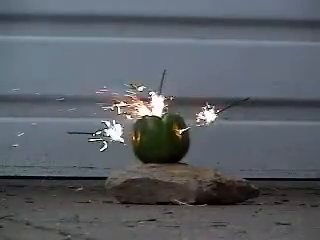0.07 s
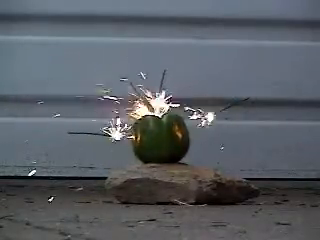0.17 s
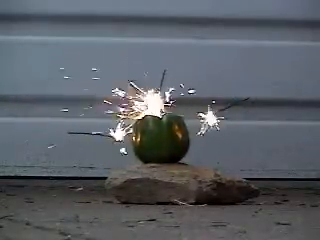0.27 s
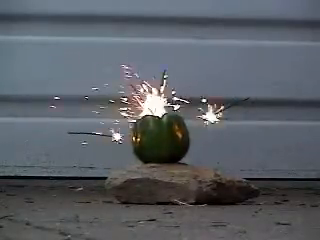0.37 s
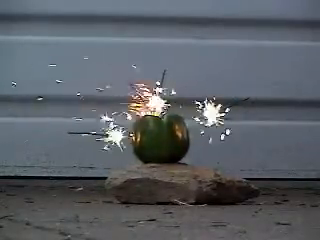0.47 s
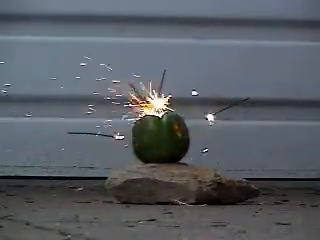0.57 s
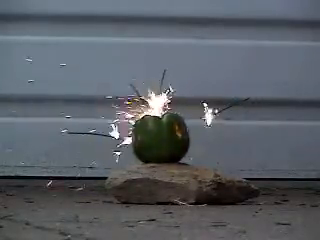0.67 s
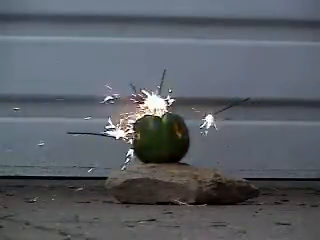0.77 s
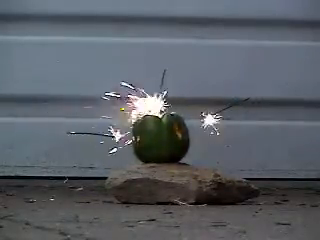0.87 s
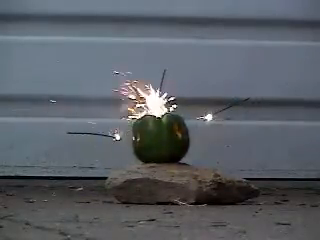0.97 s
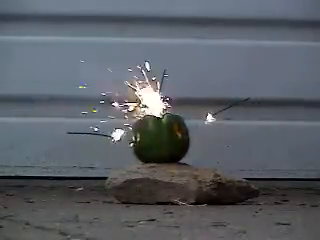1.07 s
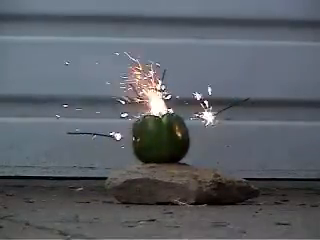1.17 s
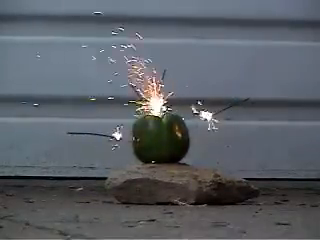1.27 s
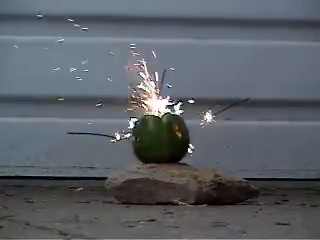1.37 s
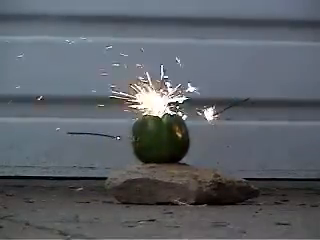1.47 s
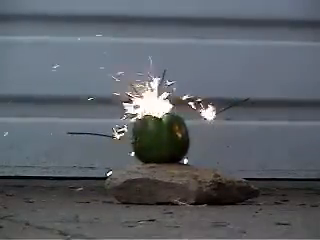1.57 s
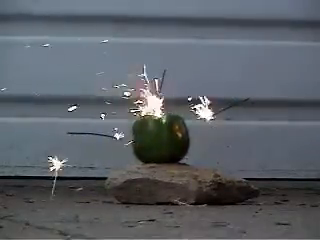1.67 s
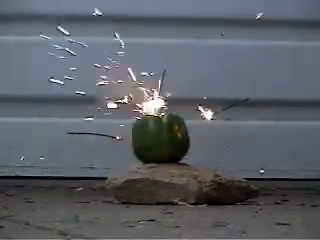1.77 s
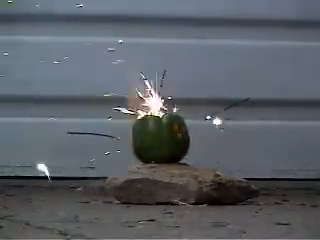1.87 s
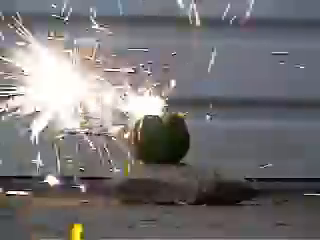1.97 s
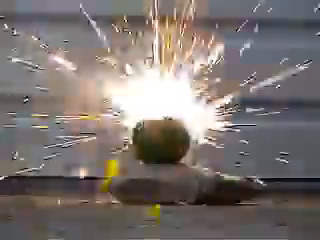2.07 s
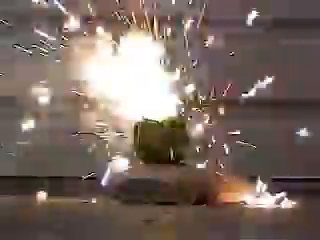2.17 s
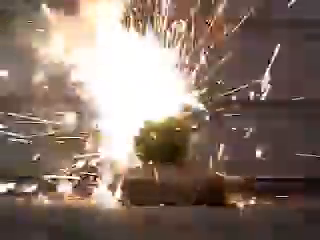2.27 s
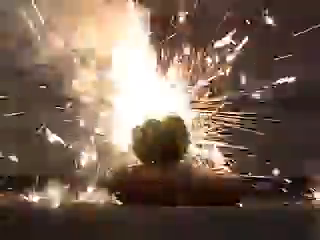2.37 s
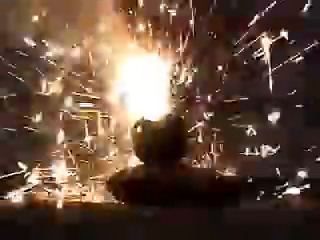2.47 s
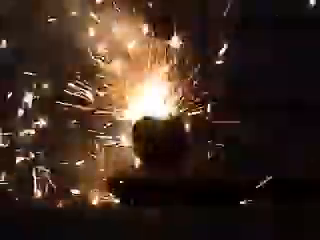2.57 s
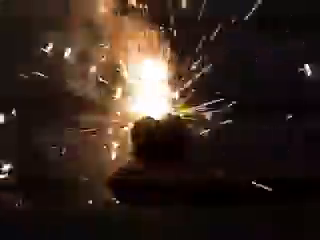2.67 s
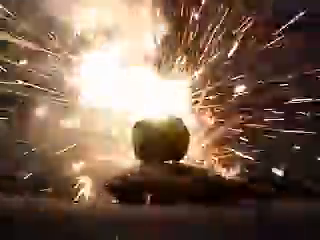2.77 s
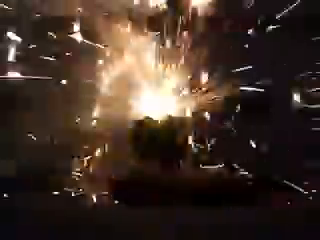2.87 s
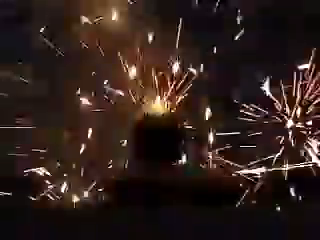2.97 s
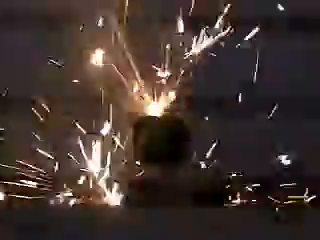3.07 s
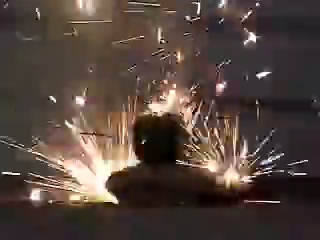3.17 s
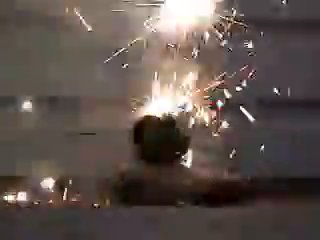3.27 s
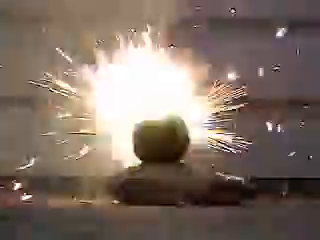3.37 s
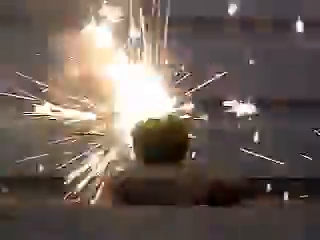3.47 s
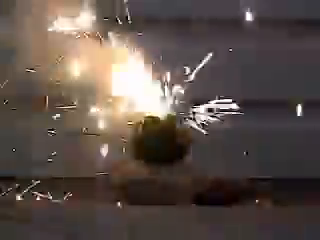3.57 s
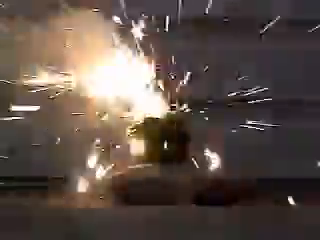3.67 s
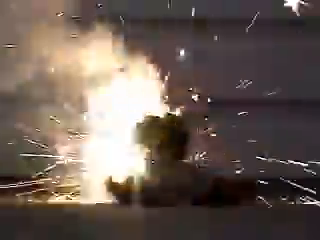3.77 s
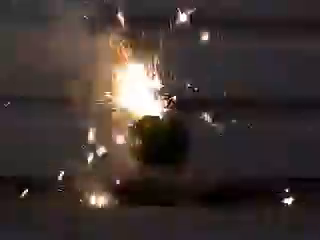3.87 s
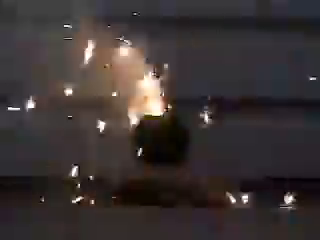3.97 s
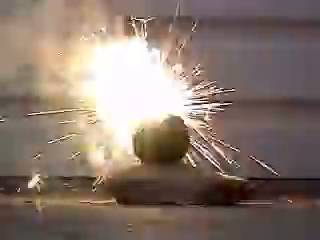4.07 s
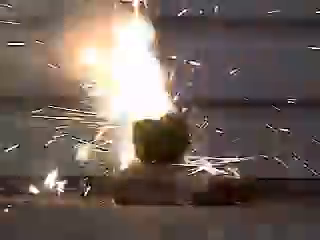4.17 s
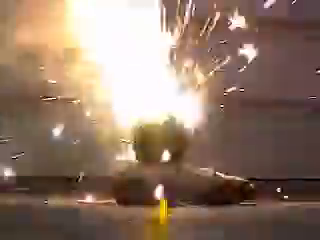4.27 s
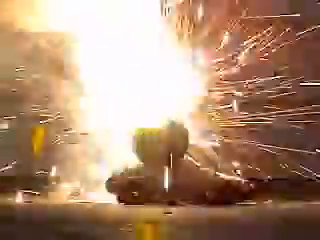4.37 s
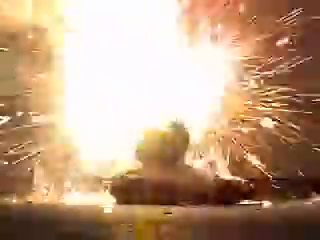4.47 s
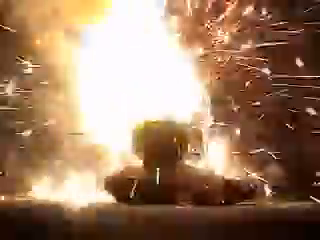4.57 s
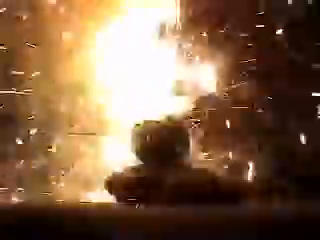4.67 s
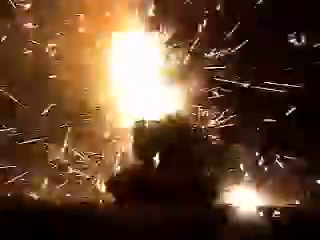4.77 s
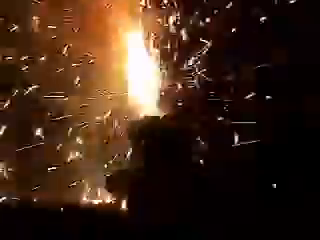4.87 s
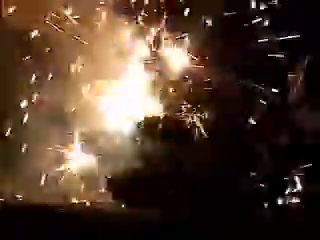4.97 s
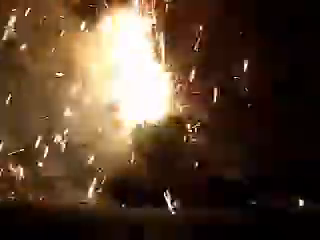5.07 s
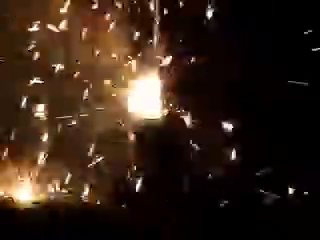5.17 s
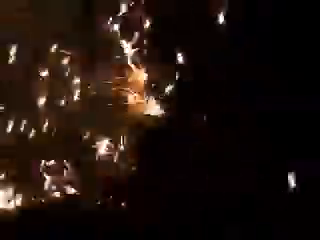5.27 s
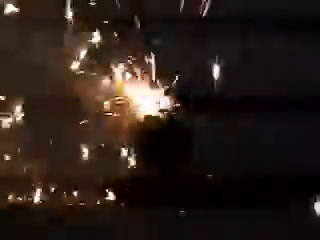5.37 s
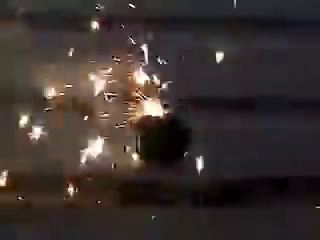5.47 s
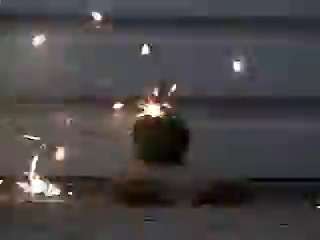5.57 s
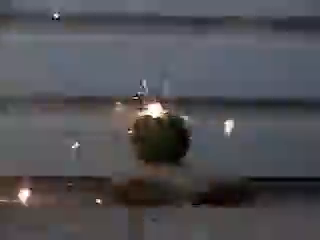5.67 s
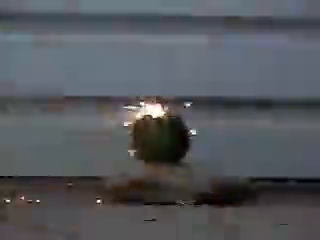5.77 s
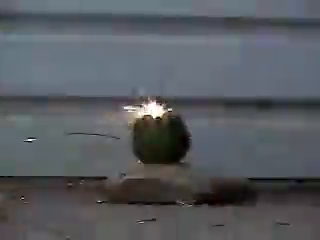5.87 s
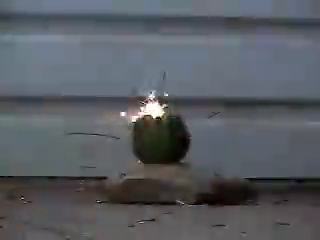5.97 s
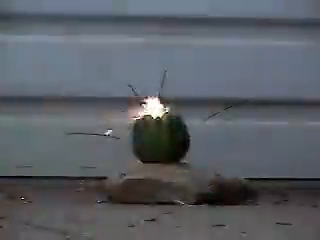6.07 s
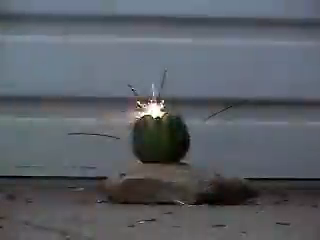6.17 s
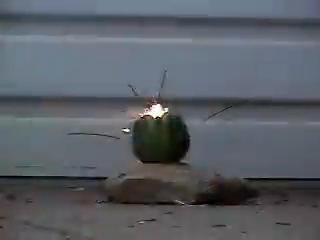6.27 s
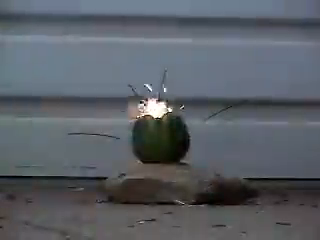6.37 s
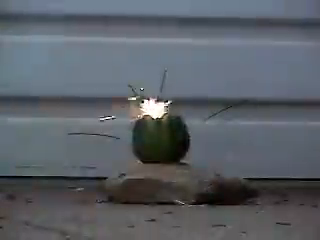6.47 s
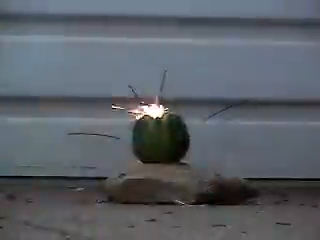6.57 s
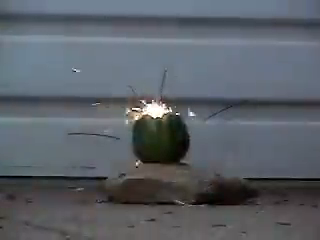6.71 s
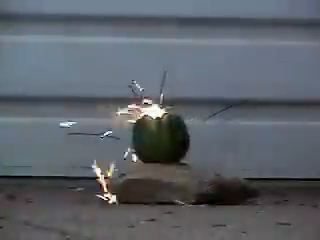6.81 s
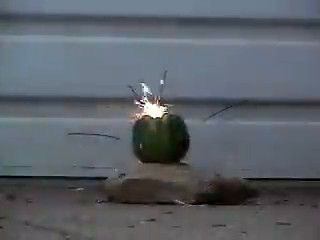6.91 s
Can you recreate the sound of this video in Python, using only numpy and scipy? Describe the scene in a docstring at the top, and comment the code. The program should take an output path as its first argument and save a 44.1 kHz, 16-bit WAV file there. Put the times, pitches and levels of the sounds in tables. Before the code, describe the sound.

Sparklers fizz softly with faint distant birds, then heavy bangs launch a deafening rapid firecracker barrage that thins out, leaving a low motor buzz.

```python
"""Sparklers fizz in a yard, as patchy noise with tiny spits, while far birds call in gliding, rough tones.
The fizz drops away at the first heavy bang; after the bangs a bunch of crackers goes off, each pop a damped
pressure spike with wall echoes and a decaying yard tail. Blasts also shove the two microphone membranes, mostly
in opposite directions. A motor's harmonic buzz and electronic self-noise run throughout, swell, and are left
alone at the end."""
import sys
import numpy as np
from scipy import signal
from scipy.fft import rfft, irfft, next_fast_len
from scipy.io import wavfile
from scipy.ndimage import uniform_filter1d

SR = 44100
rng = np.random.default_rng(int(sys.argv[2]) if len(sys.argv) > 2 else 0)


def pcm_store(signal):
    """Save signal as 16-bit PCM."""
    levels = np.round(np.clip(np.atleast_2d(signal), -1, 1) * 32767)
    wavfile.write(sys.argv[1], SR, levels.astype(np.int16).T)


N = 306038

# Single pops, loud and faint. Each row: time in seconds, strength in dB.
SINGLE_POPS = [(2.2074, -3.5), (2.2426, 4.5), (2.3177, 1.5), (2.3566, 2.5), (2.3925, -10.5), (2.4172, -7),
               (2.4274, -6), (2.4515, 1.5), (2.4968, -8), (2.5134, -6.5), (2.551, 2), (2.586, 3.5),
               (2.6476, -0.5), (2.6902, -11.5), (2.7286, 3), (2.795, -4), (2.837, -2), (2.8743, -3),
               (2.917, 3), (3.0018, -2.5), (3.0159, 2), (3.0265, 1), (3.0656, -19), (3.093, -16),
               (3.1625, 3), (3.2538, -6), (3.3053, -3.5), (3.3159, 2.5), (3.339, -4.5), (3.3544, -3.5),
               (3.3779, -1), (3.414, -3), (3.454, -1.5), (3.494, -13), (3.5282, -7), (3.551, -2.5),
               (3.558, -4.5), (3.5842, -4), (3.622, -8), (3.629, -6.5), (3.6603, 1), (3.7247, -4),
               (3.7522, -12.5), (3.763, -1.5), (3.8029, -3.5), (3.8126, -11), (3.8409, -0.5), (3.919, -1),
               (3.941, -9), (3.9503, -2), (4.0051, -2.5), (4.027, -5), (4.0348, -7.5), (4.065, 0.5),
               (4.128, -11), (4.162, 0.5), (4.264, -4.5), (4.2913, -13.5), (4.311, -2), (4.3184, -4),
               (4.341, -6), (4.365, -2.5), (4.4047, -4.5), (4.4617, -1.5), (4.4907, -5.5), (4.5171, -3),
               (4.535, -0.5), (4.5983, -7.5), (4.6253, -1), (4.7633, -5.5), (5.0422, -17), (5.0566, 0.5),
               (5.1387, 3), (5.2293, -0.5), (5.305, -7), (5.321, -1), (5.3591, 1.5), (5.392, -1.5),
               (5.41, -6), (5.4285, -0.5), (5.4936, -3), (5.5513, -5), (5.5767, -4), (5.597, -22),
               (5.6397, -4.5), (5.688, -2.5), (5.7, -7), (5.76, -20), (5.8575, -2), (6.053, -15)]
# The swarm of smaller pops. Each row: time in seconds, crackle level in dB, shove level in dB.
SWARM_LEVELS = [(2.17, -17.5, -22), (2.6, -19, -24), (2.85, -18, -23.5), (2.89, -28.5, -30),
                (2.96, -21.5, -27), (3.2, -18.5, -15), (3.26, -31, -47), (3.6, -29.5, -58),
                (4.23, -41.5, -69), (4.5, -22, -42), (4.67, -20, -21.5), (4.705, -20, -26),
                (4.75, -16, -15), (5.07, -16, -15), (5.125, -24.5, -27), (5.23, -15.5, -28),
                (5.29, -34, -33.5), (5.39, -22.5, -24.5), (5.53, -35.5, -41), (5.78, -34.5, -71)]
# Wall reflections on a pop's path. Each row: delay in milliseconds, level in dB.
WALL_ECHOES = [(10.7, -11), (12.0, -5.5), (15.3, -12)]
# Heavy first bangs. Each row: time in seconds, strength in dB, blast pitch in Hz, tail level in dB,
# corner in Hz below which the echoes thin out.
HEAVY_BANGS = [(1.9381, 4, 493, 7, 1100), (2.0607, 5, 1324, 4.5, 900), (2.161, 3, 510, 1, 151),
               (2.1672, 0, 920, -27, 910), (2.1767, 1.5, 1460, -5, 900)]


def crackers(count=7, spread_db=3.0, swarm_tail_db=-2, single_tail_db=1, turn=0.95):
    """Superposition of impulse responses: random and listed pops, each at one of a few places on the bunch."""
    # Spectrum of the yard's tail. Each row: frequency in Hz, relative level in dB per Hz.
    yard_colour = [(60, -53.5), (150, -2.5), (450, 8), (1400, 4), (3000, 6), (5300, 5), (7400, 5),
                   (8500, -26)]
    pops_per_s, thickest_db = 330, -16  # mean rate at this crackle level; a quieter swarm is thinner and smaller
    fronts = rng.permutation(np.linspace(.25, .9, count))  # some places crack sharper than others
    pitches = np.geomspace(1050, 2800, count)
    shapes = [pop(hz, yard_colour, snap=front) for hz, front in zip(pitches, fronts)]
    swarm_shapes = [direct + gain_of(swarm_tail_db) * tail for direct, tail in shapes]

    level_db = curve(SWARM_LEVELS)
    chance = pops_per_s / SR * gain_of(level_db - thickest_db)  # per sample
    size = evened(gain_of(spread_db * np.minimum(rng.exponential(1, N), 2.6)))
    pop_energy = np.mean([np.sum(shape ** 2) / 2 for shape in swarm_shapes])
    train = size * (rng.random(N) < chance) * while_on(SWARM_LEVELS)
    train = train * gain_of(level_db) / np.sqrt(pop_energy * chance)
    place = rng.integers(0, count, N)
    parts = []
    for k, shape in enumerate(swarm_shapes):
        impulses = (train * (place == k))[None]
        parts.append(signal.oaconvolve(impulses, shape, axes=1)[:, :N])

    for s, db in SINGLE_POPS:
        k = rng.integers(count)
        direct, tail = shapes[k]
        add(parts[k], s, gain_of(db) * (direct + gain_of(single_tail_db) * tail))
    sides = rng.permutation(np.linspace(-1, 1, count))  # each place lies in its own direction
    return sum(ports(part, lead=0.93 + turn * side) for part, side in zip(parts, sides))


def bangs():
    """Damped blast waves: each heavy bang has its own pitch and a darker, more even tail."""
    # Spectrum of the bangs' tail. Each row: frequency in Hz, relative level in dB per Hz.
    bang_colour = [(60, -8), (250, -1.5), (600, -7), (1500, -10.5), (3000, -6), (5500, -11.5),
                   (8500, -16.5)]
    out = np.zeros((2, N))
    for s, db, hz, tail_db, thin_hz in HEAVY_BANGS:
        direct, tail = pop(hz, bang_colour, cycles=.6, snap=0.35, early=0.21, tail_db=tail_db,
                           thin_hz=thin_hz, echo_db=5.0)
        add(out, s, gain_of(db) * (direct + tail))
    return out


def pop(hz, colour, cycles=0.7, snap=0.66, early=13.3, tail_db=-1, gap_db=-14, echo_db=0, shift_ms=0.38,
        thin_hz=300, dull_hz=7500):
    """Damped oscillation and discrete reflections; returned apart from it, the reverberant tail.

    The spike falls to 1/e after the given cycles; the tail sets in fully with the first wall echo."""
    # Reverberation time. Each row: frequency in Hz, time to decay by 60 dB in seconds.
    yard_t60 = [(100, 0.49), (300, 0.32), (1800, 0.63), (5000, 0.46), (8000, 0.41)]
    # Likeness of the tail's sides. Each row: frequency in Hz, left-right correlation as a share.
    yard_same = [(300, 0.82), (1500, 1), (3500, 0.91), (4500, 1), (8000, 1)]
    t = np.arange(17000) / SR
    spike = -np.exp(-t[:400] * hz / cycles) * np.cos(2 * np.pi * hz * t[:400])
    spike[:3] -= snap  # the steep shock front
    spike[3:8] += .45 * snap  # and the quick swing back
    spike /= 1 + snap

    paths = np.zeros((2, len(t)))
    for ms, db in WALL_ECHOES:
        at = round((ms + shift_ms * rng.uniform(-1, 1) * ms / 12) * SR / 1000)
        # a random level difference puts each echo a little to one side
        paths[:, at] = gain_of(db + echo_db + rng.uniform(-1, 1) + 2 * rng.uniform(-1, 1, 2))
    paths = highpass(paths, thin_hz, order=2)  # small walls throw back little bass
    paths[:, :40] = np.exp(-2 * np.pi * dull_hz * t[:40])  # the straight path, with dulled treble
    paths[:, :40] /= paths[0, :40].sum()
    direct = signal.oaconvolve(paths, spike[None], axes=1)[:, :len(t)]

    tail = highpass(noise(len(t), colour, yard_same, t60=yard_t60), 110, order=2)
    before_echo = t < WALL_ECHOES[0][0] / 1000
    tail = tail * np.where(before_echo, gain_of(gap_db), 1 + early * np.exp(-t / 0.007))
    tail = gain_of(tail_db) * tail / np.linalg.norm(tail[0]) * np.linalg.norm(spike)
    return direct, tail


def shoves(push_ms=1.63, sag_hz=70, left_share=-0.28):
    """Membrane displacement under blast pressure: a short push, then first-order high-pass relaxation.

    In the swarm the right side is sucked in and the left on average leans the other way."""
    # Strong blasts. Each row: time in seconds, left and right push as shares of full scale before the sag.
    strong_shoves = [(2.06, -0.23, -.45), (2.28, 0.56, -0.32), (2.451, 0.41, -0.72), (2.501, -0.32, -0.24),
                     (2.5746, -0.14, -0.6), (2.6155, -0.06, -.48), (2.679, 0.077, -0.7),
                     (2.8225, 0.2, -0.83), (2.848, 0.11, -0.46), (2.9176, 0.12, -1.5),
                     (2.9413, 0.034, -1.1), (2.9535, 0.41, -1.06), (3.0933, 0.52, -0.5),
                     (3.124, -0.047, -0.66), (3.1628, 0.25, -0.42), (3.2111, -0.096, -0.61),
                     (3.3166, 0.34, -0.54), (3.367, 0.55, -0.88), (3.5516, -0.15, -0.28),
                     (3.725, 0.29, -0.27), (3.813, -0.12, -0.33), (3.8444, -0.12, -0.69),
                     (3.9318, .22, -0.37), (4.3651, 0.016, -0.67), (4.5412, 0.066, -0.51),
                     (4.6383, -0.14, -0.76), (4.714, -.06, -0.71), (4.7312, 0.33, -0.58),
                     (4.8288, 0.22, -0.76), (4.952, -0.29, -0.72), (4.992, -0.082, -0.62),
                     (5.018, 0.32, -0.45), (5.0846, 0.0065, -0.54), (5.1597, 0.42, -1.2),
                     (5.2335, -0.41, -0.85), (5.321, 0.079, -0.32), (5.359, -0.033, -0.31),
                     (5.6408, -0.19, -0.48), (5.8583, 0.19, -0.66)]
    echo_shove_db = -10  # the strongest wall echo shoves once more
    pop_shove = 0.18  # largest right-hand push of a listed pop, as a share of its strength; left gets half
    push = signal.windows.tukey(round(push_ms * SR / 1000), .8)
    right = -rng.uniform(0.55, 1, N) ** 2 * (rng.random(N) < 330 / SR)  # 330 pushes a second on average
    left = left_share * right + 0.62 * right * rng.standard_normal(N)
    swarm = np.array([left, right]) / np.sqrt(np.mean(right ** 2) * np.sum(push ** 2))
    train = swarm * gain_of(curve(SWARM_LEVELS, column=2)) * while_on(SWARM_LEVELS)

    s, db = np.transpose(SINGLE_POPS)
    pop_push = pop_shove * rng.random((len(s), 2)).T * gain_of(db)
    train[:, np.round(s * SR).astype(int) + len(push) // 2] += pop_push * [[.5], [-1]]

    s, *swing = np.transpose(strong_shoves)
    train[:, np.round(s * SR).astype(int)] = swing
    echo_s = s + WALL_ECHOES[1][0] / 1000
    train[:, np.round(echo_s * SR).astype(int)] += gain_of(echo_shove_db) * np.array(swing)
    pushed = signal.oaconvolve(train, push[None], "same", axes=1)
    sagged = highpass(pushed, sag_hz)
    return highpass(sagged, 40)  # the vent behind the membranes


def sparklers(spits_per_s=900, spit_db=-13, treble_hz=4500):
    """Filtered noise plus random impulses: patchy hiss and spits of burning metal, with changing treble."""
    # Fizz over the street's hum. Each row: time in seconds, level in dB, treble boost in dB.
    fizz_levels = [(0.0, -37, -4), (.45, -36, -1.5), (.7, -36, 1.5), (1.2, -36.5, -4), (1.5, -36, 3.5),
                   (1.9, -37, -1.5)]
    # Spectrum of the hiss. Each row: frequency in Hz, relative level in dB per Hz.
    fizz_colour = [(15, -42), (30, -10.5), (126, -4), (380, -11.5), (600, -11), (1310, -12), (2900, -17),
                   (6600, -19), (8500, -28)]
    # Likeness of the sides. Each row: frequency in Hz, left-right correlation as a share.
    fizz_same = [(60, 1), (200, 0.91), (1000, 0.74), (2700, 0.8), (8040, 0.99)]
    hiss = evened(noise(N, fizz_colour, fizz_same, patchy_db=1.5))
    spits = np.diff(rng.standard_normal(N + 1) ** 2 * (rng.random(N + 1) < spits_per_s / SR))
    fizz = hiss + gain_of(spit_db) * evened(uniform_filter1d(spits, 5))
    treble = signal.filtfilt(*signal.butter(2, treble_hz, "high", fs=SR), fizz)
    sprayed = fizz + (gain_of(curve(fizz_levels, column=2)) - 1) * treble
    since_bang = np.maximum(np.arange(N) / SR - HEAVY_BANGS[0][0], 0)
    return gain_of(curve(fizz_levels) - 1100 * since_bang) * sprayed  # falls 1100 dB a second


def birds(warble_hz=240, echo_db=1):
    """Frequency modulation: far whistles glide to a held note, roughened and smeared by dense echoes."""
    # Calls. Each row: start in seconds, length in seconds, first pitch in Hz, held pitch in Hz,
    # level in dB before the echo mix.
    calls = [(0.161, 0.046, 4700, 3760, -43), (.22, 0.042, 3820, 3000, -44),
             (0.645, 0.16, 2890, 3040, -42.5), (0.659, .08, 2950, 3530, -42), (1.0, .17, 1890, 3040, -44),
             (1.24, 0.117, 1230, 1404, -44.5), (1.319, 0.12, 4050, 2980, -40),
             (1.492, 0.18, 2326, 3050, -43)]
    settle, fade_db = 0.29, -3.5  # share of the call for about two thirds of the glide; level change by the end
    out = np.zeros((1, N))
    for start, length, first_hz, held_hz, db in calls:
        u = np.linspace(0, 1, round(length * SR))
        wander = evened(uniform_filter1d(rng.standard_normal(9000), 150))[:len(u)]
        rough = warble_hz * held_hz / 3000 * wander
        hz = held_hz + (first_hz - held_hz) * np.exp(-(u / settle) ** 2) + rough
        shape = signal.windows.tukey(len(u), .25) * gain_of(db + fade_db * u)
        add(out, start, np.sqrt(2) * shape * np.sin(2 * np.pi * np.cumsum(hz) / SR)[None])
    blur = rng.standard_normal((2, 6000)) * np.exp(-np.arange(6000) / 1800)
    blur /= np.linalg.norm(blur[0])
    return 1.17 * out + gain_of(echo_db) * signal.oaconvolve(out, blur, axes=1)[:, :N]


def motor(scatter_db=1.5):
    """Harmonic series of a rotation: multiples of the turning rate, louder right, over electronic self-noise."""
    # Harmonics that stand out or drop out. Each row: frequency in Hz, level in dB before the swell.
    lines = [(522, -73), (899, -63), (973, -97), (1123, -87), (1198, -73), (1798, -65), (2094, -69),
             (2171, -88), (2246, -88), (2320, -71), (2546, -105), (2993, -67), (3295, -71), (3519, -110),
             (3819, -92), (3892, -70), (4194, -72), (4490, -72), (4791, -75), (5016, -110), (5093, -79)]
    # All other harmonics. Each row: frequency in Hz, level in dB before scatter and swell.
    rest = [(75, -77), (300, -81), (600, -74), (1050, -83), (1550, -75), (1950, -80), (2500, -71),
            (3330, -77), (3460, -104), (3600, -80), (4200, -81), (5400, -86), (6100, -95), (7000, -87),
            (8000, -96)]
    # Balance. Each row: frequency in Hz, left minus right in dB.
    tilt = [(300, -2), (900, -13), (2700, -13), (8000, -4)]
    # Course of buzz and self-noise. Each row: time in seconds, gain in dB.
    swell = [(0, -8.5), (6.1, 4), (6.5, 2.5), (6.94, 1)]
    # Self-noise spectrum. Each row: frequency in Hz, relative level in dB per Hz.
    self_noise = [(40, -60), (90, -9), (250, -14), (1000, -24), (8000, -31)]
    turn_hz, turns, self_noise_db = 74.87, 16, -71  # turning rate, turns in one loop, level before the swell
    flip_low_hz, flip_high_hz = 650, 1300  # between these the left side swings against the right
    size = round(SR / turn_hz * turns)
    k = np.arange(1, 107)
    hz = k * turn_hz
    db = read(rest, hz) + scatter_db * rng.standard_normal(len(k))
    for line_hz, line_db in lines:
        db[round(line_hz / turn_hz) - 1] = line_db

    left = gain_of(read(tilt, hz))
    left = np.where((hz > flip_low_hz) & (hz < flip_high_hz), -left, left)
    sides = np.array([left, np.ones(len(k))]) * 2 / (1 + left)  # the signed mean of the sides is 1
    tick = np.where(k % 4 == 0, .25, 1)  # four ticks a turn nearly line up every fourth multiple
    phase = np.pi + tick * rng.uniform(-np.pi, np.pi, len(k)) + .25 * rng.standard_normal((2, len(k)))
    bins = np.zeros((2, size // 2 + 1), complex)
    bins[:, turns * k] = gain_of(db) * sides * np.exp(1j * phase)
    loop = irfft(bins, size) * size / np.sqrt(2)
    buzz = np.tile(loop, N // size + 1)[:, :N]
    hiss = evened(noise(N, self_noise, same=[(100, 0.54), (8000, .3)]))  # (Hz, left-right correlation)
    return gain_of(curve(swell)) * (buzz + gain_of(self_noise_db) * hiss)


def ports(x, lead=0.61):
    """Interchannel level and phase: the right port hears the middle treble louder, with a phase drift there.

    The lead is in radians between the ports for every 3 dB of level difference."""
    # Balance. Each row: frequency in Hz, left minus right in dB.
    port_tilt = [(500, 0.5), (900, -2), (1600, -3), (2700, -3), (4700, -0.5), (8000, 0.5)]
    size = next_fast_len(N)
    tilt_db = read(port_tilt, np.fft.rfftfreq(size, 1 / SR))
    half = gain_of(tilt_db / 2) * np.exp(-.5j * lead * tilt_db / 3)
    return irfft(rfft(x, size) * [half, 1 / half], size)[:, :N]


def noise(size, colour, same, t60=None, patchy_db=0):
    """Partly coherent noise: random short-time spectra in two channels, steady or dying band by band."""
    hz = np.fft.rfftfreq(512, 1 / SR)
    a, b, c, d, patches = rng.standard_normal((size // 128 + 5, 257, 5)).T
    like = np.clip(read(same, hz), -1, 1)[:, None]
    left = a + 1j * b
    right = like * left + np.sqrt(1 - like ** 2) * (c + 1j * d)
    smooth_patches = evened(uniform_filter1d(uniform_filter1d(patches, 14, 0), 50, 1))
    db = read(colour, hz)[:, None] + patchy_db * smooth_patches
    if t60:
        db = db - 60 * np.arange(a.shape[1]) * 128 / SR / read(t60, hz)[:, None]
    spectra = np.array([left, right]) * gain_of(db)
    return signal.istft(spectra, nperseg=512, noverlap=384)[1][:, :size]


def highpass(x, hz, order=1):
    """Butterworth filter: attenuates what lies below the corner frequency."""
    return signal.lfilter(*signal.butter(order, hz, "high", fs=SR), x)


def gain_of(db):
    """Decibel law: amplitude ratio of a level."""
    return 10 ** (np.asarray(db) / 20)


def evened(x):
    """Normalisation to unit root mean square."""
    return x / np.sqrt(np.mean(x ** 2) + 1e-20)


def read(points, hz):
    """Interpolation of a table along a logarithmic frequency axis."""
    f, value = np.transpose(points)
    return np.interp(np.log(hz + 1), np.log(f + 1), value)


def curve(rows, column=1):
    """Linear interpolation of a table column over time."""
    rows = np.array(rows)
    return np.interp(np.arange(N) / SR, rows[:, 0], rows[:, column])


def while_on(rows):
    """Time gate: true between the first and last row of a table."""
    t = np.arange(N) / SR
    return (t > rows[0][0]) & (t < rows[-1][0])


def add(mix, s, sound):
    """Superposition: adds a sound from a given second on, cut at the end of the mix."""
    part = mix[:, round(s * SR):][:, :sound.shape[1]]
    part += sound[:, :part.shape[1]]


def scene():
    """Linear superposition of airborne sound, membrane shoves and motor buzz."""
    air = crackers() + ports(bangs() + sparklers() + birds())
    air = highpass(air, 35)  # the microphone passes no steady pressure
    return air + shoves() + motor()


def record(dry):
    """Saturation and band limit: the biggest blasts clip, then a low-pass removes what lies above 8 kHz."""
    clipped = np.clip(dry, -.95, .95)
    lowpass = signal.firwin(221, 8000, window=("kaiser", 9), fs=SR)
    return signal.oaconvolve(clipped, lowpass[None], "same")


dry = scene()
out = record(dry)
pcm_store(out)
```